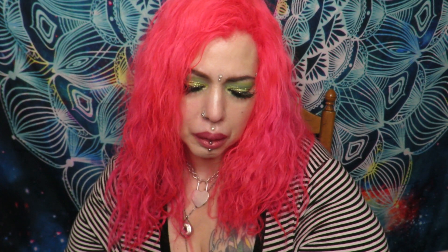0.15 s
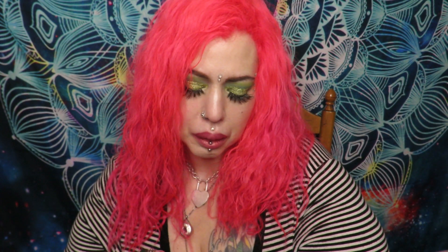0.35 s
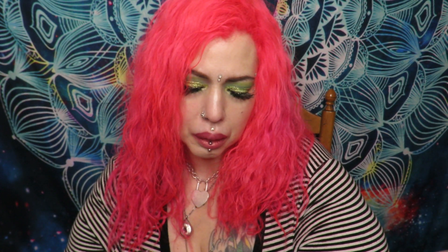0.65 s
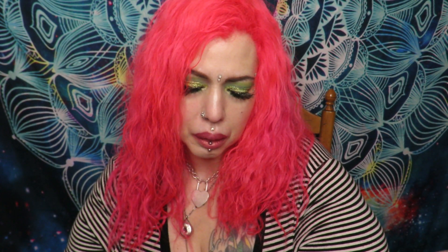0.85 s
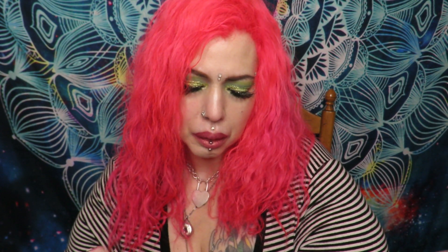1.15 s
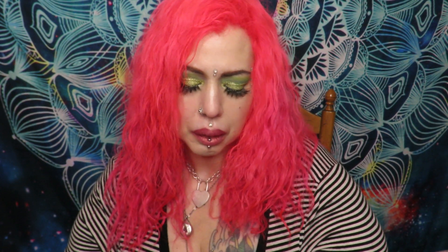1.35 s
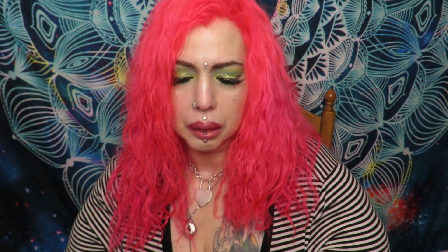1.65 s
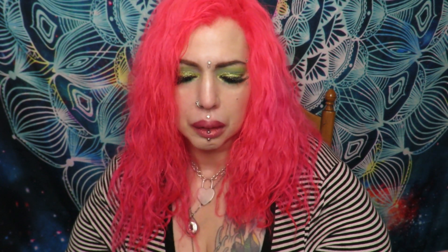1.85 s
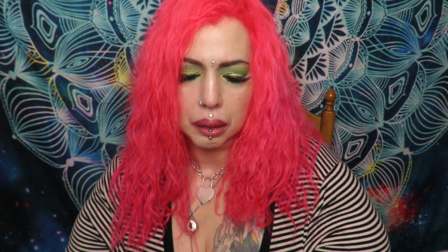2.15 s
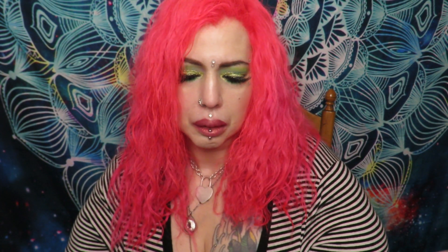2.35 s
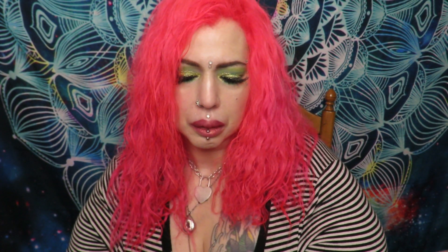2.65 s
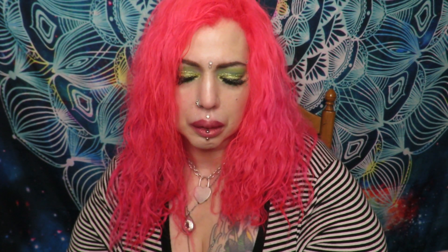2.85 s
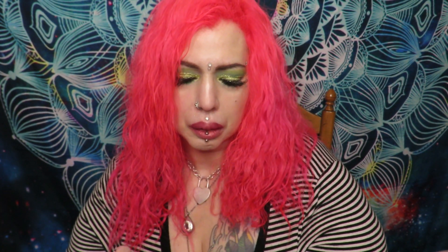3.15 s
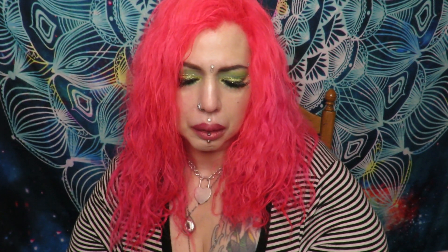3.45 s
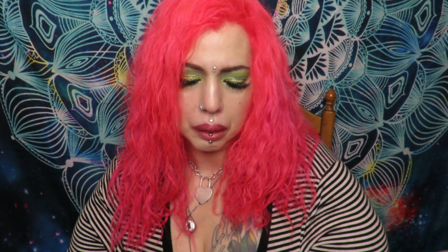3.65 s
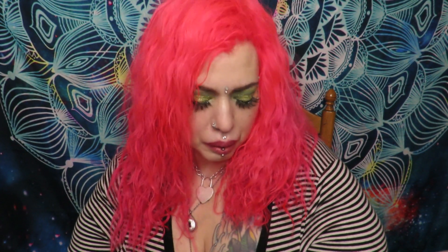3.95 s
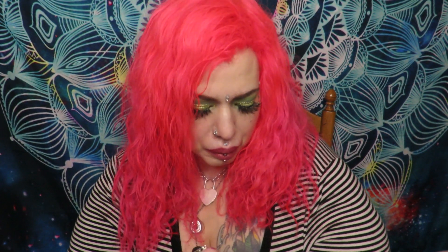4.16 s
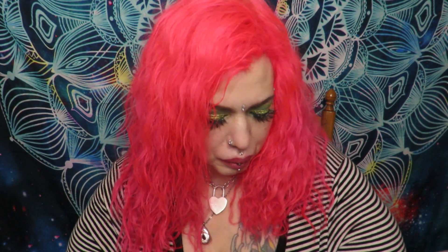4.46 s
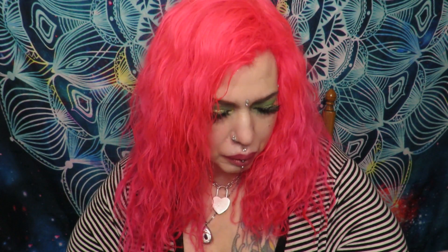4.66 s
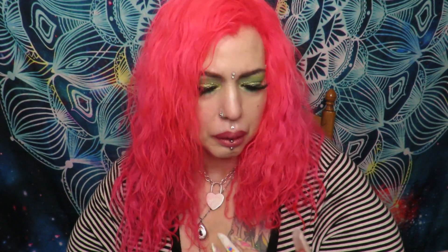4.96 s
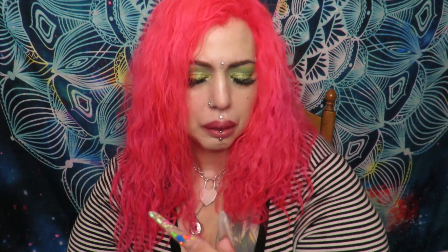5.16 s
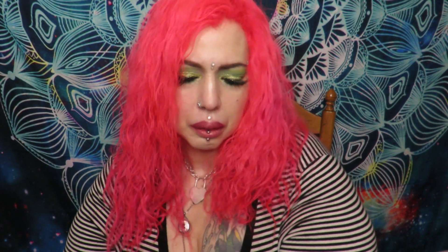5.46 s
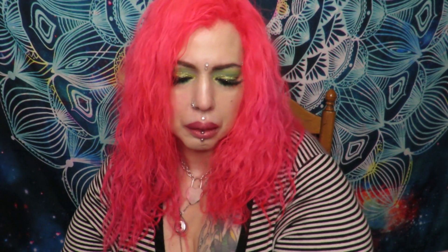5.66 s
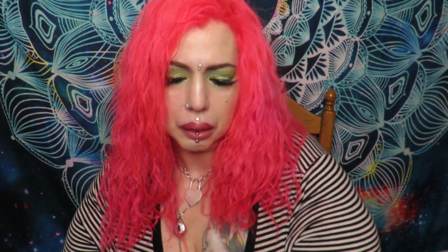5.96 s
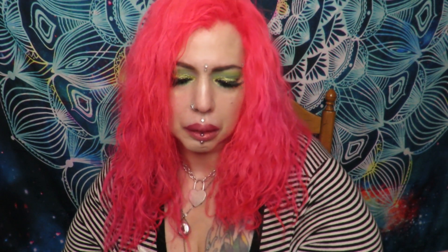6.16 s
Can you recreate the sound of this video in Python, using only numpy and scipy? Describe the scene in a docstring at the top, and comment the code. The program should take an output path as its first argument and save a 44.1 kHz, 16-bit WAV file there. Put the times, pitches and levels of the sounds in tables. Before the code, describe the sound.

A steady low mains hum around 120 Hz, slowly throbbing with a weaker octave, runs throughout under a soft, wide, mostly low rush of air. The first second has no handling. Around 1.3 s a light double plastic tick gives a short hollow ping; more ticks and brief rubs follow at 1.5-1.7 s. After a lull and faint dull touches, a clearer click lands at 2.8 s, weaker ones at 3.0 and 3.7-4.0 s. At 4.1 s a cap snaps hard, by far the loudest event, with tiny aftershocks and a barely audible thin squeak by 4.4 s. At 4.9-5.2 s tubes rock down onto a table with low woody knocks and clicks. From 5.7 s bright ticks cluster, with a sharp scrape and high squeak near 5.9 s, then small clicks, slides and squeaks until about 6.3 s. Close, centred handling; short small-room reverberation.

```python
"""Caps of plastic lipstick tubes snap and tick close to the microphone in a small, quiet room.
Damped modes make the caps, table modes the tubes set down, decaying sines the short pings of tube and sleeve.
Streams of tiny slips make the sliding sleeves, unsteady tones their squeaks.
Behind them a mains hum wavers as close tones beat, and filtered noise makes a soft rush of air."""
import sys
import numpy as np
from scipy import signal
from scipy.fft import rfft, irfft
from scipy.io import wavfile
from scipy.ndimage import uniform_filter1d, map_coordinates

SR = 44100
rng = np.random.default_rng(int(sys.argv[2]) if len(sys.argv) > 2 else 0)


def master_out(mix):
    """Clip the mix to full scale and print it as 16-bit PCM to the path in sys.argv[1]."""
    frames = np.transpose(np.atleast_2d(mix))
    ceiling = np.clip(frames, -1, 1)
    pcm = np.round(ceiling * 32767).astype(np.int16)
    wavfile.write(sys.argv[1], SR, pcm)


N = 278271
TIME = np.arange(N) / SR


def from_db(db):
    """Decibels to gain."""
    return 10 ** (np.asarray(db) / 20)


def rms_one(x):
    """Scale to unit rms."""
    return x / np.sqrt(np.mean(x ** 2) + 1e-20)


def peak_one(x):
    """Scale to unit peak."""
    return x / np.max(np.abs(x))


def add(track, s, sound):
    """Mix a sound into a track at a time in seconds."""
    start = int(np.clip(round(s * SR), 0, N - 1))
    track[start:start + len(sound)] += sound[:N - start]


def at_hz(points, hz):
    """Read a table on a log-frequency axis."""
    table = np.array(points)
    return np.interp(np.log(hz + 1), np.log(table[:, 0]), table[:, 1])


def butter(x, hz, kind, order=2):
    """Causal low-, high- or band-pass."""
    edges = np.clip(hz, 10, SR / 2 - 500)
    return signal.sosfilt(signal.butter(order, edges, kind, fs=SR, output="sos"), x)


def coloured(x, spectrum, tilt_db=0):
    """Give a signal a spectrum, tilted by so many dB an octave."""
    hz = np.fft.rfftfreq(x.shape[-1], 1 / SR)
    lowest = spectrum[0][0]
    slope = tilt_db * np.log2(np.maximum(hz, lowest) / lowest)
    return irfft(rfft(x) * from_db(at_hz(spectrum, hz) + slope), x.shape[-1])


def narrow_noise(hz, width_hz):
    """Noise in a resonance, rms 1."""
    offset = (np.fft.rfftfreq(N, 1 / SR) - hz) / (width_hz / 2)
    return rms_one(irfft(rfft(rng.standard_normal(N)) / (1 + offset ** 2), N))


def drift(rate_hz, t):
    """Smooth random wander of spread about 1."""
    knots = rng.standard_normal(4096)
    return map_coordinates(knots, [t * rate_hz], order=3, mode="wrap")


def struck(modes, length, tilt_db=0, scatter_db=1.0):
    """One blow: every mode rings with a slightly different strength each time."""
    hz, width, db = np.array(modes, float).T[:, :, None]
    t = TIME[:int(length * SR)]
    scatter = scatter_db * rng.standard_normal(hz.shape)
    # a wide mode dies sooner, so its width in the gain keeps its spectral height
    gain = width * from_db(db + tilt_db * np.log2(hz) + scatter)
    return np.sum(gain * np.exp(-np.pi * width * t) * np.cos(2 * np.pi * hz * t), axis=0)


def scuffed(blow, scuff_s, scuff_db, count=3):
    """Tiny touches come just before and after the firm one, scuff_s later; all-passes keep the colour."""
    touch = np.clip(from_db(scuff_db), 0, .7)
    shares = rng.uniform(.3, 1, count)
    for k, lag in enumerate(shares / shares.sum() * scuff_s * SR):
        loop = np.r_[1, np.zeros(int(lag)), touch * (-1) ** k]
        blow = signal.lfilter(loop[::-1], loop, blow)
    return blow


# caps snapping, rattling and ticking near the microphone, before the hand shields them:
# (time [s], peak level [dB], brightness [dB per octave])
CAP_CLICKS = [(1.297, -33.5, 10), (1.306, -31.5, 0), (1.509, -28, -2), (1.5178, -27, -1), (1.552, -30, 4),
              (1.558, -41, -7), (1.7022, -36, 20), (2.43, -38.5, -15), (2.661, -37.5, -10),
              (2.692, -36, -12), (2.7772, -25.5, -1), (3.0231, -37.5, -8), (3.114, -42, 4),
              (3.7355, -35.5, 6), (3.8235, -36.5, -22), (3.958, -34, -17), (4.1098, -7, -5.5),
              (4.1154, -27, 8), (4.1293, -27, -2), (4.919, -40, -17), (4.957, -38, -22), (4.976, -43, -14),
              (5.1827, -23.5, 1), (5.1891, -23.5, -9.5), (5.32, -33.5, 6), (5.571, -31, -14.5),
              (5.739, -30.5, 32), (5.746, -35, 28), (5.757, -27.5, 4), (5.76, -28, 4), (5.856, -29, 15),
              (5.8782, -27, 12), (5.886, -23, 10), (6.072, -29.5, 15), (6.1477, -33, 12), (6.1825, -35, 10),
              (6.2137, -32.5, 2)]
# modes of a cap: (frequency [Hz], width [Hz], relative level [dB])
CAP_MODES = [(820, 600, -16), (2057, 340, -39), (2730, 590, 2.5), (2540, 170, -15.5), (3530, 280, 1),
             (4170, 450, 1), (4960, 770, -3), (5830, 360, -6), (7830, 2000, -1), (10600, 2900, -23),
             (12600, 1800, -1.5)]
# scuffing around a tick: lead [s], level beside the firm touch [dB], rise per dB of lighter tick [dB]
SCUFF_S, SCUFF_DB, SCUFF_GROWTH = .0015, -10.5, 0.45
# the hand shields faint ticks more than hard snaps:
# peak level that comes through unchanged [dB], loss of direct path per dB below it [dB]
OPEN_HAND_DB, SHIELDING = -22, 0.28


def clicks(low_hz=450, top_hz=12500):
    """A cap's damped modes snap, light ticks scuff more; gives direct sound and what enters the room."""
    direct, spread = np.zeros((2, N))
    for s, db, bright_db in CAP_CLICKS:
        blow = butter(struck(CAP_MODES, .06, bright_db), [low_hz, top_hz], "band", order=4)
        above_open = db - OPEN_HAND_DB
        snap = from_db(db) * peak_one(blow)
        snap = scuffed(snap, SCUFF_S, SCUFF_DB - SCUFF_GROWTH * above_open)
        add(direct, s - SCUFF_S, from_db(SHIELDING * above_open) * snap)
        add(spread, s - SCUFF_S, snap)
    return direct, spread


# tubes set down on the table, rocking as they land:
# (time [s], peak level before scuffing [dB], contact hardness [Hz])
TABLE_KNOCKS = [(4.917, -36, 1450), (4.9233, -28, 1300), (4.9462, -21, 730), (4.951, -25, 695),
                (4.9608, -19.5, 900), (4.966, -30, 1250), (5.092, -22, 1700), (5.098, -29.5, 810),
                (5.1896, -18.5, 1620), (5.1945, -24, 1110), (5.755, -35, 2350)]
# modes of the table top: (frequency [Hz], width [Hz], relative level [dB])
TABLE_MODES = [(245, 32, -17), (290, 32, -0.5), (344, 77, -14), (447, 60, -2.5), (505.4, 17, 6.5),
               (693, 69, -14), (744, 68, -12.5), (915, 68, -2.5), (1060, 170, -10), (1490, 160, -15),
               (1820, 200, -13), (2290, 200, -27), (2900, 180, -7.5)]


def knocks(low_hz=160, scuff_s=0.0025, scuff_db=-14):
    """The table top rings as a tube lands and scuffs; a softer contact leaves out its high modes."""
    out = np.zeros(N)
    for s, db, hard_hz in TABLE_KNOCKS:
        blow = butter(struck(TABLE_MODES, .2), hard_hz, "low", order=3)
        blow = from_db(db) * peak_one(butter(blow, low_hz, "high"))
        add(out, s - scuff_s, scuffed(blow, scuff_s, scuff_db))
    return out


# short pitched pings, from hollow tubes tapped and from a sleeve ringing as it is rubbed:
# (time [s], peak level [dB], frequency [Hz], time to fall 60 dB [s])
SHORT_PINGS = [(1.289, -43, 2300, 0.042), (1.3065, -25.5, 2295, 0.045), (1.551, -27.5, 2330, 0.005),
               (2.186, -48, 3060, 0.017), (2.777, -30.5, 2870, 0.0076), (3.0236, -39, 2650, 0.0043),
               (3.728, -35.5, 2200, .004), (3.7365, -31.5, 1970, 0.0052), (4.989, -47, 3000, 0.027),
               (5.092, -26, 2170, 0.0067), (5.099, -30, 2233, 0.014), (5.19, -35, 2830, 0.024),
               (5.7545, -24.5, 2060, 0.0048), (5.761, -35, 2050, 0.0046), (5.79, -32.5, 1920, 0.0091),
               (5.874, -44, 1860, 0.035), (5.877, -36.5, 2945, 0.045)]


def pings():
    """A tapped hollow tube or a rubbed sleeve rings at one pitch: a sine that dies exponentially."""
    out, t = np.zeros(N), TIME[:SR // 5]
    for s, db, hz, t60 in SHORT_PINGS:
        add(out, s, from_db(db - 60 * t / t60) * np.sin(2 * np.pi * hz * t))
    return out


# sleeves and tubes sliding:
# (time of firmest grip [s], rise and fall [s], level [dB], brightness [dB per octave])
SLEEVE_SLIDES = [(1.473, 0.02, -58, -2.5), (1.515, 0.015, -47.5, -8), (1.546, 0.0076, -48, -8),
                 (1.72, 0.27, -67.5, -3.5), (2.6, 0.12, -60.5, -14), (3.04, 0.1, -70, -6),
                 (4.921, 0.01, -45.5, -17.5), (4.966, 0.015, -48, -12.5), (4.994, 0.0058, -50.5, 1),
                 (5.078, 0.022, -45, -24.5), (5.866, 0.015, -36, 1), (5.881, 0.0068, -28.5, 6),
                 (5.95, 0.065, -56, -3), (6.081, 0.023, -49, 1), (6.17, 0.05, -58, -1.5),
                 (6.221, 0.011, -50.5, -5), (6.305, 0.015, -49.5, -8)]
# colour of rubbed plastic: (frequency [Hz], relative level per Hz [dB])
RUB_COLOUR = [(600, -29.5), (1800, -5.5), (2900, -5.5), (3800, -2.5), (5500, -6.5), (8000, -4), (9200, -4),
              (11000, 3.5), (13800, 1.5), (15500, 0.5)]
# modes of a thin sleeve: (frequency [Hz], width [Hz], relative level [dB])
SLEEVE_MODES = [(1880, 42, -1), (2960, 42, 6.5), (4550, 100, -8), (5530, 140, -7), (6610, 62, 7),
                (6660, 51, 8.5), (8110, 68, 7), (10400, 110, 3), (11270, 180, 6.5), (13000, 82, 10),
                (13100, 88, 7), (14010, 100, 12.5)]


def slides(slips_per_s=700, spread_db=4.5, hiss=0.093, low_hz=700, ring_even_db=-33):
    """Sliding is a stream of tiny uneven slips that swells with the grip and sets the sleeve ringing."""
    out, t = np.zeros(N), TIME[:SR // 2]
    since = t - t.mean()  # seconds from the firmest grip
    for s, rise, db, bright_db in SLEEVE_SLIDES:
        sizes = from_db(spread_db * np.minimum(rng.exponential(1, len(t)), 3))
        happens = rng.random(len(t)) < slips_per_s / SR
        slips = happens * sizes * rng.choice([-1, 1], len(t))
        slips = slips + hiss * rng.standard_normal(len(t))
        grip = from_db(db) * np.exp(-(since / rise) ** 2)
        rub = grip * rms_one(butter(coloured(slips, RUB_COLOUR, bright_db), low_hz, "high"))
        sleeve = struck(SLEEVE_MODES, .08)
        ring = signal.fftconvolve(grip * rms_one(slips), sleeve / np.linalg.norm(sleeve))[:len(t)]
        # a firmer, brighter slide rings the sleeve more
        ring_gain = from_db(db - ring_even_db + bright_db)
        add(out, s - t.mean(), (rub + ring_gain * ring) / np.hypot(1, ring_gain))
    return out


# tight plastic squeaking as it turns:
# (time [s], length before ringing out [s], level ahead of the mix in scene() [dB], note [name])
SLEEVE_SQUEAKS = [(4.176, .044, -68, "middle"), (4.417, 0.069, -59.5, "middle"), (4.418, .05, -59, "high"),
                  (4.989, 0.012, -51, "low"), (5.875, 0.016, -30, "low"), (5.994, .022, -57, "low"),
                  (6.061, .005, -43, "middle"), (6.063, .005, -42, "high"), (6.08, .016, -47, "middle"),
                  (6.108, 0.021, -45, "middle"), (6.145, .008, -38, "high"), (6.163, 0.032, -49, "middle"),
                  (6.183, .005, -54, "high"), (6.198, 0.02, -46, "middle")]
# the three modes that a sleeve squeaks on: note [name] to frequency [Hz]
SQUEAK_NOTES = {"low": 6700, "middle": 8350, "high": 14850}


def squeaks(jitter=0.005, jitter_hz=500, flutter_db=4.5, flutter_hz=150, attack_s=0.002, ring_t60=0.04):
    """Short slips each drive one thin sleeve mode, unsteady in pitch and strength, that then rings out."""
    out, t = np.zeros(N), TIME[:SR // 5]
    for s, length, db, note in SLEEVE_SQUEAKS:
        ring_out = from_db(-60 * np.maximum(t - length, 0) / ring_t60)
        swell = np.clip(t / attack_s, 0, 1) * ring_out
        hz = SQUEAK_NOTES[note] * (1 + jitter * drift(jitter_hz, t))
        phase = 2 * np.pi * np.cumsum(hz) / SR
        strength = from_db(db + flutter_db * drift(flutter_hz, t))
        add(out, s, swell * strength * np.sin(phase))
    return out


# mains hum at twice the line frequency: frequency [Hz], level [dB rms]
HUM_HZ, HUM_DB = 120.03, -41
# weaker tones close to the hum beat against it and make it throb:
# (offset from the hum [Hz], level [dB rms], first swell [s])
HUM_BEATS = [(1.5, -66.5, 0.33), (-3.5, -53.5, 0.27), (-7.5, -58.5, 0.07)]


def hum(octave_db=-50.5, octave_pan_db=1.4, waver_db=3.5, waver_hz=17):
    """The hum throbs as nearby tones drift in and out of step; its octave wavers, a little to the left."""
    phase = 2 * np.pi * HUM_HZ * TIME
    nearby = 0
    for offset_hz, db, swell_s in HUM_BEATS:
        nearby = nearby + from_db(db) * np.sin(phase + 2 * np.pi * offset_hz * (TIME - swell_s))
    pan_db = octave_pan_db * np.array([[1], [-1]])
    octave = from_db(octave_db + waver_db * drift(waver_hz, TIME) + pan_db) * np.sin(2 * phase)
    return np.sqrt(2) * (from_db(HUM_DB) * np.sin(phase) + nearby + octave)  # sqrt 2: rms to peak


# colour of the air in the room: (frequency [Hz], relative level per Hz [dB])
AIR_COLOUR = [(21, -46), (35, -24), (66, -34), (92, -27), (112, 2.5), (141, -10), (234, 0), (266, 0.5),
              (302, -3.5), (465, -4.5), (502, -4), (3630, -25), (12200, -41.5), (15000, -41)]
# low resonances droning in the room: (frequency [Hz], width [Hz], level [dB rms])
ROOM_DRONES = [(59, 14, -58), (125, 21, -54), (169, 14.5, -60), (229, 114, -66), (481.2, 8.9, -60),
               (738.7, 26, -66), (903.4, 23, -64.5), (975, 67, -63.5)]


def air(top_hz=13500, shared=0.12, rush_db=-47.5):
    """A diffuse rush of noise, nearly unrelated left and right, over drones that both sides share."""
    white = rng.standard_normal((2, N)) + shared * rng.standard_normal(N)
    rush = from_db(rush_db) * rms_one(butter(coloured(white, AIR_COLOUR), top_hz, "low", order=4))
    drones = sum(from_db(db) * narrow_noise(hz, width) for hz, width, db in ROOM_DRONES)
    return rush + drones


def evened(x, size=50):
    """Smooth broad peaks and dips out of a response, so that it adds little colour."""
    spectrum = rfft(x)
    power = uniform_filter1d(np.mean(np.abs(spectrum) ** 2, axis=0), size)
    return irfft(spectrum / np.sqrt(power + power.mean() / 20), x.shape[-1])


# decay of the small room: (frequency [Hz], time to fall 60 dB [s], left-right likeness [0 to 1])
ROOM_DECAY = [(201, 0.36, 0.71), (1000, 0.28, 0.99), (3000, 0.22, 0.96), (6000, 0.29, 0.63),
              (12800, 0.21, 0.014), (15000, 0.17, .014)]


def room_tail(onset=0.0023, near_db=-6, clump_db=1.5, clump_hz=600, blend_s=0.035, count=10):
    """Noise dies band by band: near things scatter first, then the walls answer in clumps that blend."""
    t, edges, tail = TIME[:SR // 2], np.geomspace(100, 20000, count + 1), 0
    for low, high in zip(edges, edges[1:]):
        hz = np.sqrt(low * high)
        alike = np.clip(at_hz(np.array(ROOM_DECAY)[:, ::2], hz), 0, 1)
        mid, side = butter(rng.standard_normal((2, len(t))), [low, high], "band")
        pair = np.sqrt(1 + alike) * mid + np.sqrt(1 - alike) * side * [[1], [-1]]
        tail = tail + pair * from_db(-60 * t / at_hz(ROOM_DECAY, hz))
    clumps_db = clump_db * drift(clump_hz, t) * np.exp(-t / blend_s)
    tail = evened(tail * from_db(clumps_db)) * from_db(near_db * (t < onset))
    tail = tail[:, :SR // 3]
    return tail / np.sqrt(np.sum(tail ** 2) / 2)  # unit energy, averaged over the two sides


# first reflections from wall and ceiling: (delay [s], level [dB])
FIRST_ECHOES = [(.0062, -8.5), (.0085, -14.5), (.011, -7)]


def in_room(direct, spread, tail, wet_db, shade_hz=11000):
    """Direct sound, its treble shaded by the hands, early reflections reaching one side first, and tail."""
    response = from_db(wet_db) * tail
    for k, (delay, db) in enumerate(FIRST_ECHOES):
        # one side hears it a sample before the other
        response[[k % 2, 1 - k % 2], int(delay * SR) + np.arange(2)] += from_db(db)
    reflected = signal.fftconvolve(spread[None], response, axes=1)[:, :N]
    return butter(direct, shade_hz, "low", order=1) + reflected


def scene():
    """All handling is in the middle of the stereo image; each kind of sound has its own share of the room."""
    tail = room_tail()
    caps = in_room(*clicks(), tail, wet_db=1.0)
    knock = knocks()
    table = in_room(from_db(0.5) * knock, knock, tail, wet_db=-2.0)
    ping = pings()
    pinging = in_room(ping, ping, tail, wet_db=-3.0)
    rub = slides()
    rubbing = in_room(rub, rub, tail, wet_db=-0.5)
    squeak = from_db(-4.5) * squeaks()
    squeaking = in_room(squeak, squeak, tail, wet_db=-8.0)
    return caps + table + pinging + rubbing + squeaking + hum() + air()


def record(dry, cutoff_hz=15600):
    """An elliptic low-pass cuts the top steeply."""
    return signal.sosfilt(signal.ellip(10, .2, 80, cutoff_hz, fs=SR, output="sos"), dry)


dry = scene()
out = record(dry)
master_out(out)
```